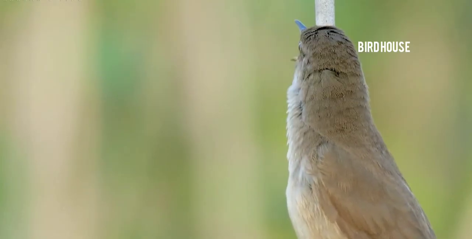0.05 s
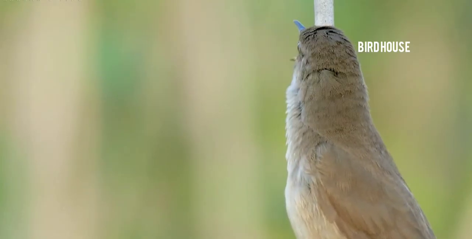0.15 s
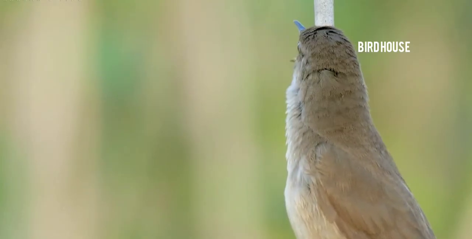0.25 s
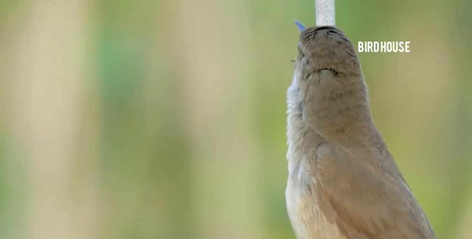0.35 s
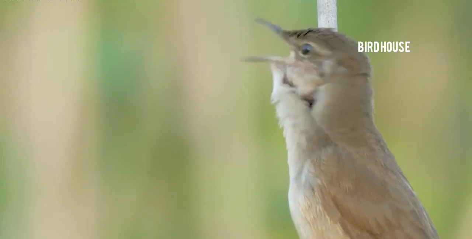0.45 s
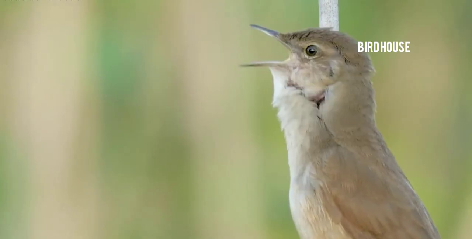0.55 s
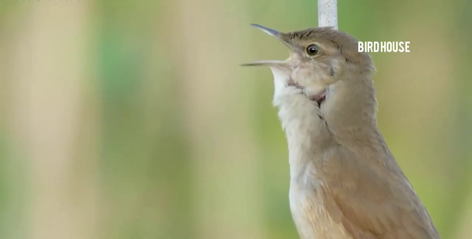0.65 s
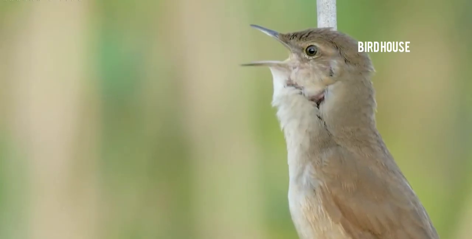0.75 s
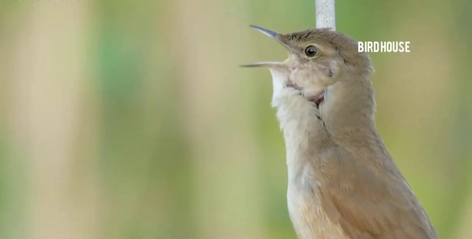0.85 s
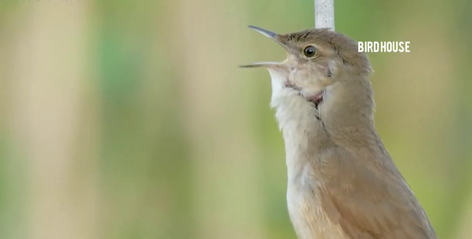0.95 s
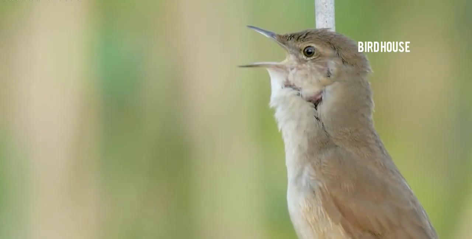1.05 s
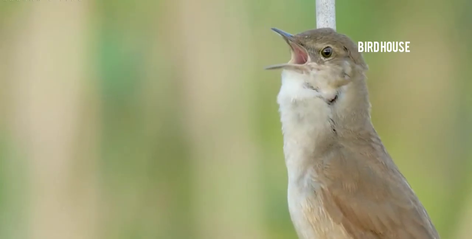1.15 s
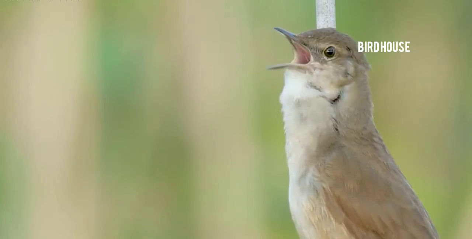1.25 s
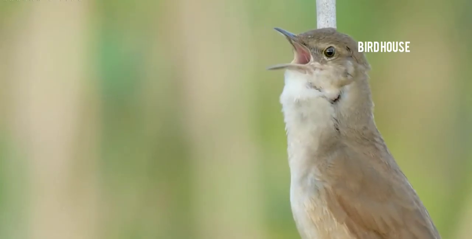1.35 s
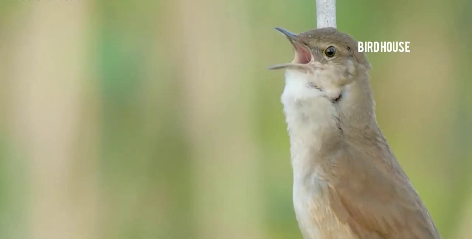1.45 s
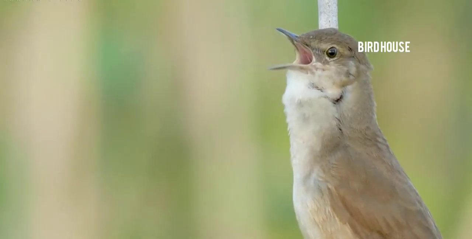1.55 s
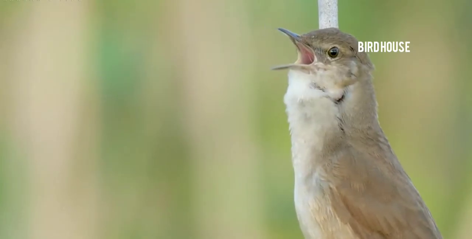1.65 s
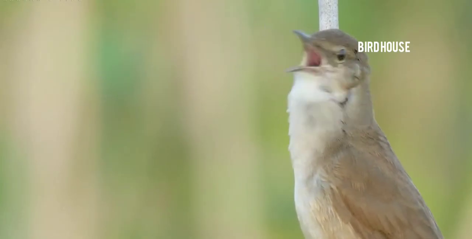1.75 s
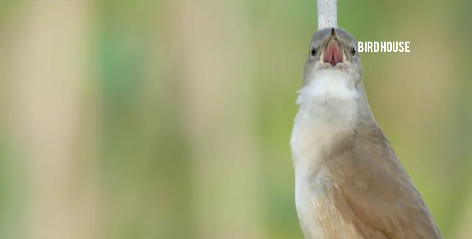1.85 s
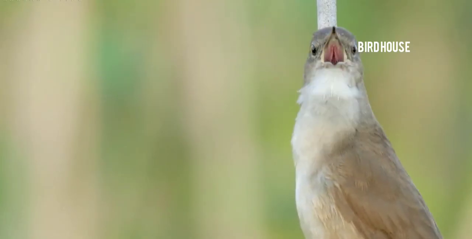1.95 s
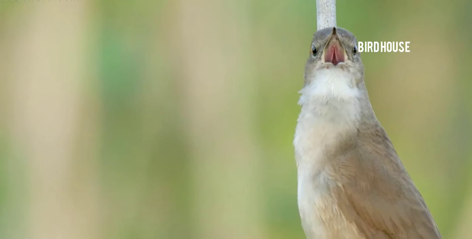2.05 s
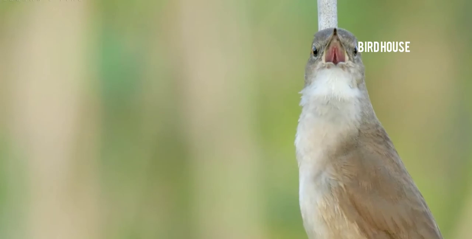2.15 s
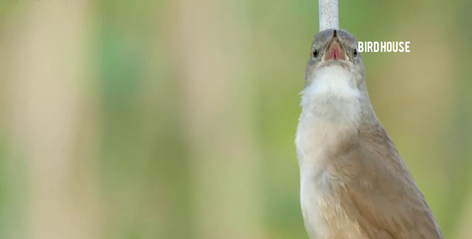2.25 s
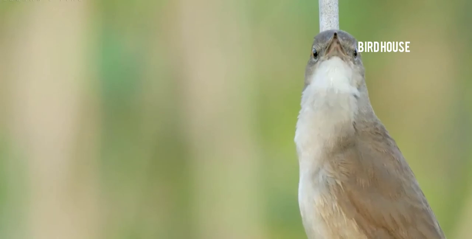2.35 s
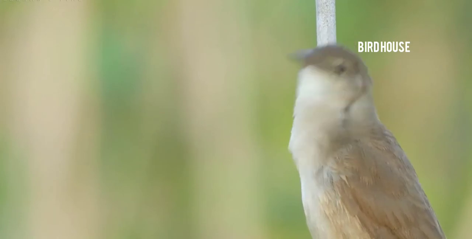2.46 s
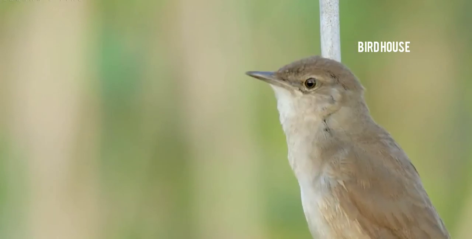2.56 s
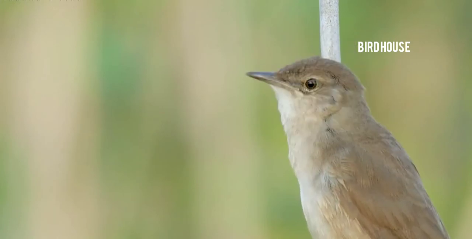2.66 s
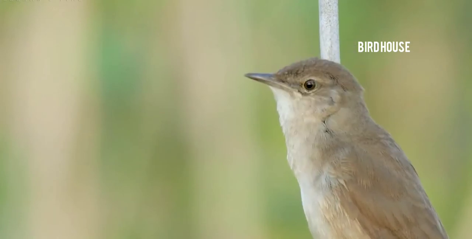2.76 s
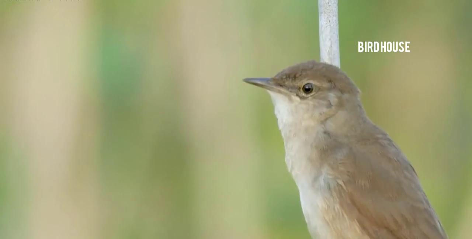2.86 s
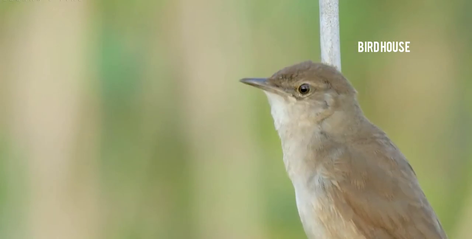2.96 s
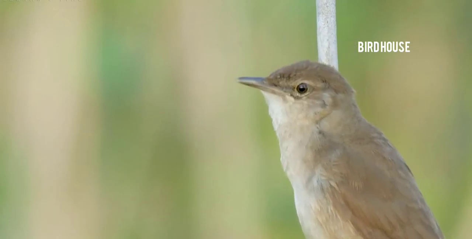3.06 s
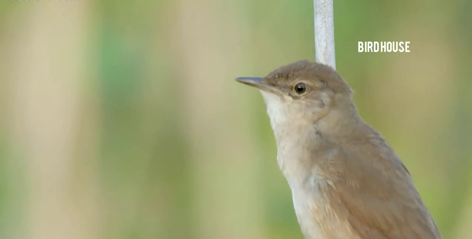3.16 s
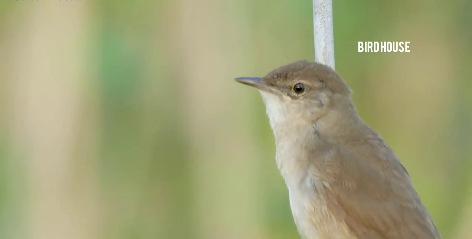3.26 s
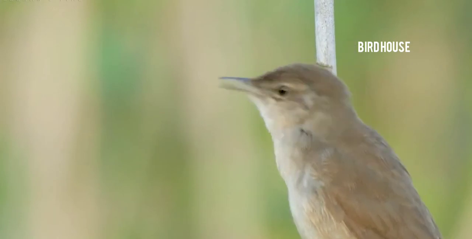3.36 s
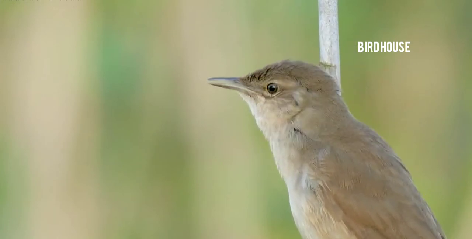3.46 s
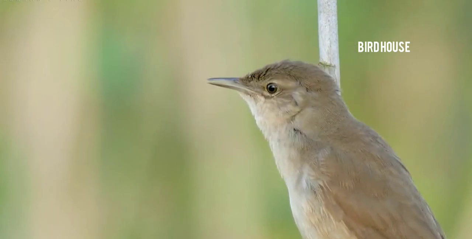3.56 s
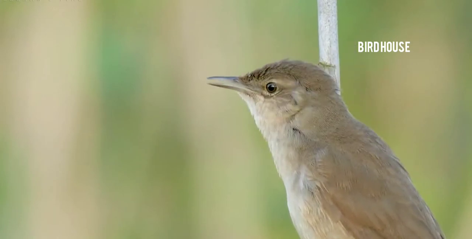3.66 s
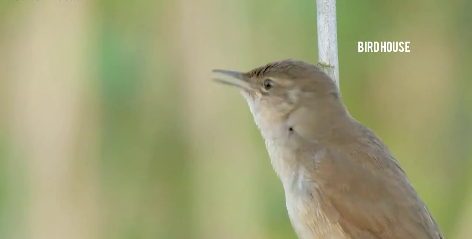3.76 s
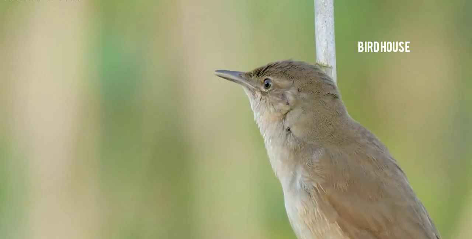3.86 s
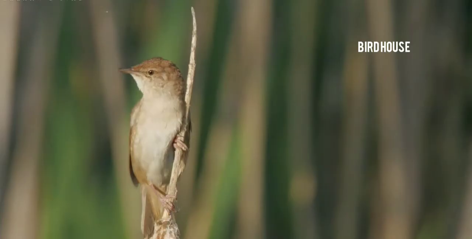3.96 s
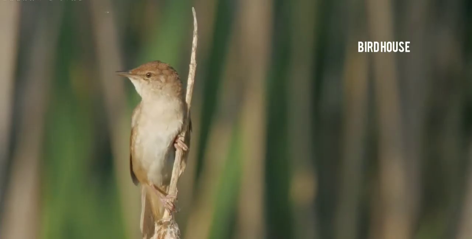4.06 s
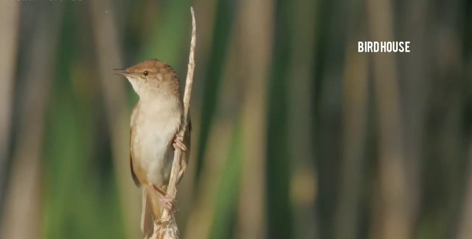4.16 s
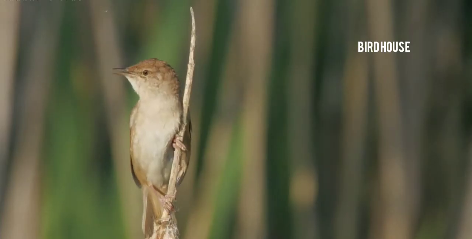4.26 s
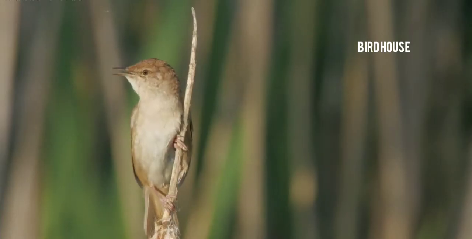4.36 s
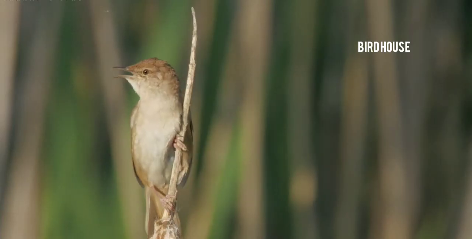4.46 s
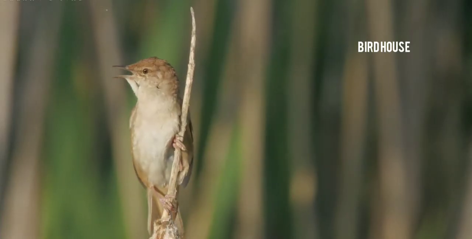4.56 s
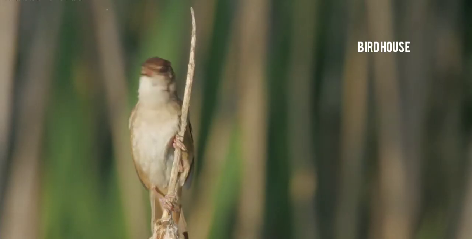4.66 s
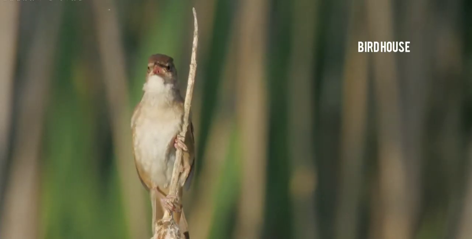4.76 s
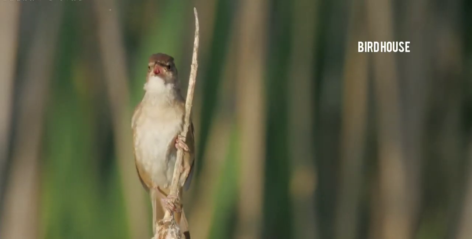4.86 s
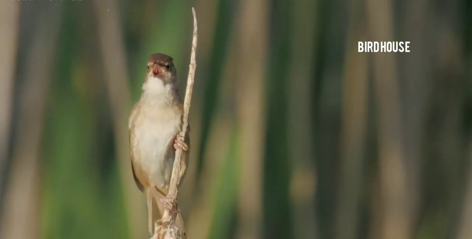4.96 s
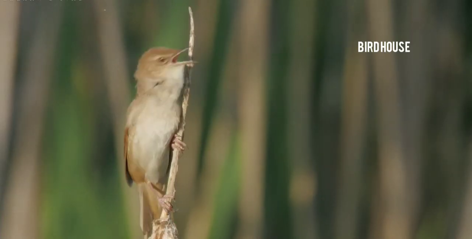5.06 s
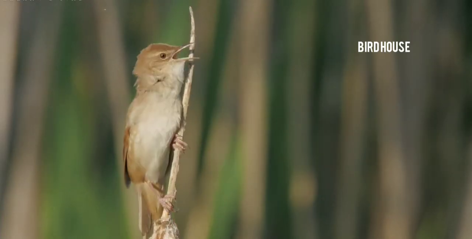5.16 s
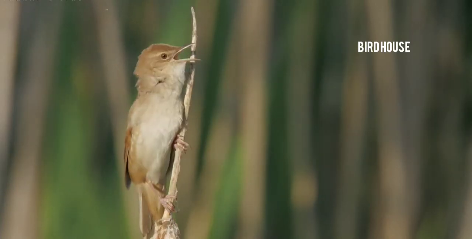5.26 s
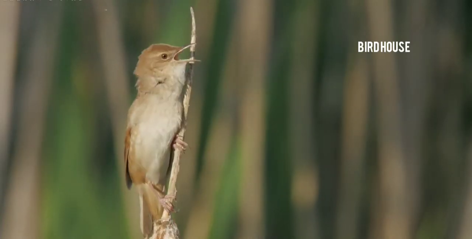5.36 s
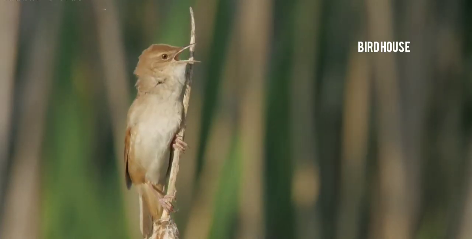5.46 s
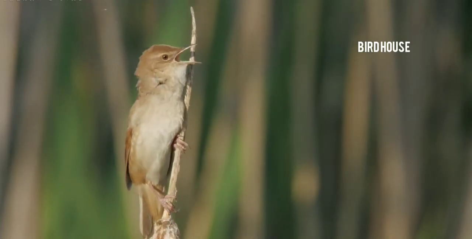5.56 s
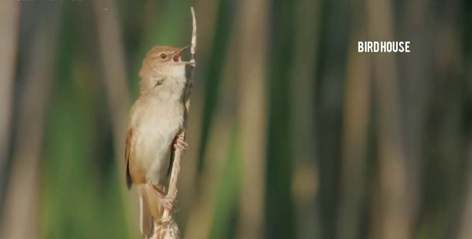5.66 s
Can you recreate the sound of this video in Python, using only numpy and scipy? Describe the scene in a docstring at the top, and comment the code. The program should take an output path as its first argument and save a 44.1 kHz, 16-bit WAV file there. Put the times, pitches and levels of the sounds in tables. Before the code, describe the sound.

A warbler close to the microphone sings a steady, high, buzzing trill that slows slightly and stops after about two and a half seconds. Fainter frogs croak and throb behind it over a soft outdoor hiss. In the pause, distant birds whistle and chirp, with a few short clucks. Near the end the warbler begins a second trill, quiet and ticking at first, then swelling.

```python
"""A warbler on a reed opens with a long trill, some 54 syllables a second, turning its head. Each
syllable is a click and a few short glides of the syrinx. Behind it, over a soft outdoor wash, frogs
croak and throb as larynx clicks ring their vocal sacs. The trill slows and stops at 2.4 s, leaving
the frogs, whistles of farther birds and a few clucks. At 4.6 s a second trill starts cold, quiet
and hurried, then warms up and swells. The reed bed scatters the voices."""
import sys
import numpy as np
from scipy import signal
from scipy.io import wavfile
from scipy.ndimage import uniform_filter1d

SR = 44100
rng = np.random.default_rng(int(sys.argv[2]) if len(sys.argv) > 2 else 0)


def bounce(signal):
    """Save signal as a 16-bit WAV file at the path given by the first command-line argument."""
    frames = np.transpose(np.atleast_2d(signal))
    limited = np.clip(frames, -1, 1)
    pcm = np.round(limited * 32767).astype(np.int16)
    wavfile.write(sys.argv[1], SR, pcm)


N = 251370


def amp(db):
    """Decibels to gain."""
    return 10 ** (np.asarray(db) / 20)


def unit_rms(x):
    """Scales to rms 1."""
    return x / np.sqrt(np.mean(x ** 2) + 1e-20)


def spectrum_at(points, hz):
    """Interpolates a spectrum over log frequency."""
    point_hz, value = np.transpose(points)
    return np.interp(np.log(hz + 1), np.log(point_hz + 1), value)


def curves_at(rows, t):
    """Interpolates each value column at times t."""
    time_s, *values = np.transpose(rows)
    return [np.interp(t, time_s, column) for column in values]


def add(mix, start_s, sound, pan_db=0.):
    """Mixes mono into stereo; positive pan is left."""
    at = round(start_s * SR)
    part = mix[:, max(at, 0):max(at + len(sound), 0)]
    part += amp([[pan_db / 2], [-pan_db / 2]]) * sound[max(-at, 0):][:part.shape[1]]


def resonate(x, hz, width_hz):
    """Unity-gain resonance: shift hz down to zero, smooth, shift back."""
    carrier = np.exp(2j * np.pi * np.cumsum(hz * np.ones(len(x))) / SR)
    pole = np.exp(-np.pi * width_hz / SR)
    return 2 * (carrier * signal.lfilter([1 - pole], [1, -pole], x / carrier)).real


def wander(rate_hz):
    """Smooth noise, rms 1."""
    size = max(int(SR / rate_hz), 1)
    return unit_rms(uniform_filter1d(uniform_filter1d(rng.standard_normal(N), size), size))


def reed_scatter(x, t60_s, gap_s):
    """Reed-bed echoes: a decaying tail of random taps, unlike in each ear."""
    t = np.arange(round(.6 * SR)) / SR
    taps = rng.standard_normal((2, len(t))) * amp(-60 * t / t60_s) * (t > gap_s)
    taps += .26 * taps[::-1]
    return signal.fftconvolve(x, taps / np.linalg.norm(taps[0]), axes=1)[:, :N]


# wash spectrum: (frequency [Hz], relative density [dB])
WASH_SPECTRUM = [(30, -59), (85, -26), (341, -30), (518, -24.5), (1050, -17.5), (1770, -2.5), (2180, -2.5),
                 (3230, -10.5), (3780, -5), (5310, -12.5), (11900, -19), (15500, -23.5)]
# left-right likeness: (frequency [Hz], correlation [0..1])
WASH_CORRELATION = [(40, 0.79), (300, 1), (3000, 0.56), (8000, 0.86), (13000, 0.35)]
# swell of far frogs: (time [s], lift [dB])
CHORUS_LIFT = [(0, 8), (3.6, 11), (3.75, 4.5), (4.9, 3.5), (5.7, 12)]
# band of that swell: (frequency [Hz], share of lift [0..1])
CHORUS_BAND = [(250, 0), (450, 1), (3000, 1), (7000, 0)]
def wash(rms_db=-43.5):
    """Far chorus, air and reeds: random short-time spectra with drifting patches."""
    frames, hz = N // 256 + 5, np.fft.rfftfreq(1024, 1 / SR)
    left_re, left_im, side_re, side_im, patches = rng.standard_normal((frames, 513, 5)).T
    patches = unit_rms(uniform_filter1d(uniform_filter1d(patches, size=9, axis=0), size=7, axis=1))
    far_birds = np.exp(-(np.log((hz + 1) / 3500) / .5) ** 2)[:, None]
    patch_db = (1.5 + 3 * far_birds) * patches
    lift_db = curves_at(CHORUS_LIFT, np.arange(frames) * 256 / SR)[0]
    chorus_db = spectrum_at(CHORUS_BAND, hz)[:, None] * lift_db
    correlation = spectrum_at(WASH_CORRELATION, hz)[:, None]
    left = left_re + 1j * left_im
    right = correlation * left + np.sqrt(1 - correlation ** 2) * (side_re + 1j * side_im)
    spectra = np.array([left, right]) * amp(spectrum_at(WASH_SPECTRUM, hz)[:, None] + patch_db + chorus_db)
    return amp(rms_db) * unit_rms(signal.istft(spectra, nperseg=1024, noverlap=768)[1][:, :N])


# reed snaps: (time [s], gain [dB])
SNAPS = [(2.581, -45.5), (5.208, -53)]
def reed_snaps(t60_s=.037):
    """Dry reeds snap: brief bursts of bright noise."""
    out, t = np.zeros((2, N)), np.arange(400) / SR
    for start_s, db in SNAPS:
        add(out, start_s, amp(db - 60 * t / t60_s) * np.diff(rng.standard_normal(402), 2), pan_db=3.)
    return out


# far birds: (time [s], length [s], start pitch [Hz], end pitch [Hz], level [dB])
WHISTLES = [(0.264, .08, 6200, 5240, -49), (0.485, 0.071, 6220, 5300, -52),
            (2.633, 0.082, 6080, 5980, -52.5), (2.698, 0.052, 5560, 4750, -51.5),
            (2.692, 0.015, 3430, 3270, -40.5), (2.673, 0.33, 3980, 3970, -50),
            (2.844, 0.016, 3730, 3000, -38.5), (2.853, 0.042, 6040, 6160, -53),
            (2.896, 0.072, 5170, 4860, -51), (3.088, 0.016, 3670, 3240, -42.5),
            (3.203, 0.054, 5140, 4910, -50), (3.306, 0.069, 7300, 4540, -55.5),
            (3.415, 0.039, 4920, 4570, -48.5), (3.567, 0.027, 3536, 3760, -36),
            (3.613, 0.024, 4070, 2870, -40), (3.641, 0.026, 3060, 2915, -36),
            (3.687, 0.048, 4500, 2750, -47), (3.727, 0.066, 2720, 2620, -43.5),
            (3.835, 0.075, 3156, 3660, -40), (3.88, 0.054, 7070, 4900, -51.5),
            (3.993, 0.025, 4680, 4390, -45), (4.012, 0.088, 2970, 2440, -45), (4.15, 0.21, 2740, 2920, -53),
            (4.344, 0.032, 2860, 3120, -46.5), (4.454, 0.032, 4030, 3680, -46.5),
            (4.797, 0.068, 5990, 5900, -54.5)]
RASP_DB, RASP_PITCH_RATIO = 8, .014
def whistles():
    """Gliding near-sines; the high twitter rasps, the rest only flutters."""
    out, flutter, shake = np.zeros((2, N)), wander(300), wander(500)
    sides = rng.uniform(-.86, 1, len(WHISTLES))
    for (start_s, length_s, start_hz, end_hz, db), side in zip(WHISTLES, sides):
        u = np.linspace(0, 1, round(length_s * SR))
        span = slice(round(start_s * SR), round(start_s * SR) + len(u))
        twitter = min(start_hz, end_hz) > 4400 and max(start_hz, end_hz) < 6500
        flutter_db, shake_ratio = (RASP_DB, RASP_PITCH_RATIO) if twitter else (4., .007)
        bend = np.sin(np.pi * u / 2) if start_hz < 5000 else u ** 3  # low glides ease, high speed up
        hz = (start_hz + (end_hz - start_hz) * (u + bend) / 2) * (1 + shake_ratio * shake[span])
        tone = np.sin(2 * np.pi * np.cumsum(hz) / SR) * signal.windows.tukey(len(u), .35)
        add(out, start_s, amp(db + flutter_db * np.minimum(flutter[span], 1)) * tone, 3.4 * side)
    return out


# scooped whistles, one table each: (time [s], pitch [Hz], level [dB])
SLURS = [
    [(3.505, 2860, -47), (3.53, 3210, -41), (3.56, 3900, -54), (3.6, 4670, -46), (3.65, 4850, -61)],
    [(4.14, 3810, -37.5), (4.175, 3704, -35.5), (4.218, 3790, -35.5), (4.235, 4270, -42),
     (4.258, 4850, -45.5), (4.3, 4850, -47.5), (4.33, 4560, -54)],
]
def slurs():
    """Whistles that slide unbroken between notes and rasp at the top."""
    out, flutter = np.zeros((2, N)), wander(250)
    for rows in SLURS:
        start_s, end_s = rows[0][0], rows[-1][0]
        hz, db = curves_at(rows, np.arange(start_s, end_s, 1 / SR))
        depth = np.clip((hz - 4000) / 700, .15, 1)
        rasp = depth * np.clip(flutter[round(start_s * SR):][:len(hz)], -3, 1)
        hz = uniform_filter1d(hz, size=700) * (1 + RASP_PITCH_RATIO * rasp)
        tone = np.sin(2 * np.pi * np.cumsum(hz) / SR) * signal.windows.tukey(len(hz), .08)
        add(out, start_s, amp(db + RASP_DB * rasp) * tone)
    return out


# marsh clucks: (time [s], level [dB])
CLUCKS = [(3.903, -34), (4.124, -37), (4.452, -34), (4.53, -41)]
def clucks(base_hz=2557, rise_s=.002, t60_s=.04):
    """One quick ring each, slightly detuned."""
    out, t = np.zeros((2, N)), np.arange(600) / SR
    for (start_s, db), tune in zip(CLUCKS, rng.uniform(.94, 1.03, len(CLUCKS))):
        envelope = amp(db - 60 * t / t60_s) * np.minimum(t / rise_s, 1)
        add(out, start_s, envelope * np.sin(2 * np.pi * base_hz * tune * t))
    return out


def larynx(rate_hz, size, hiss_gain):
    """Uneven clicks of a frog's larynx over a little hiss."""
    drift, loudness, hiss = rng.standard_normal((size, 3)).T
    cycles = np.cumsum(rate_hz * (1 + 3. * uniform_filter1d(drift, 300))) / SR + .9
    clicks = np.diff(np.floor(cycles), prepend=0) * amp(1.77 * loudness)
    return unit_rms(clicks) + hiss_gain * hiss


# frog position: (time [s], left minus right [dB])
FROG_PAN = [(0, -2), (1.8, -5.5), (3, -2), (5.7, 9.5)]
# croaks: (time [s], length [s], start resonance [Hz], end resonance [Hz], level [dB])
CROAKS = [(0.41, 0.096, 1420, 1430, -42.5), (0.547, 0.19, 2040, 1830, -41.5),
          (0.703, 0.14, 1540, 1440, -43), (0.751, 0.13, 1910, 2000, -41), (0.822, 0.12, 1420, 1570, -38.5),
          (0.974, 0.12, 1360, 1680, -44.5), (1.49, 0.14, 1220, 1580, -45), (1.653, 0.17, 1330, 1530, -40.5),
          (2.249, 0.23, 2060, 1790, -39.5), (2.714, 0.035, 1840, 1960, -39.5),
          (2.754, .14, 1405, 1560, -40), (3.143, 0.4, 1527, 1606, -43.5), (3.369, 0.22, 1976, 2000, -36),
          (3.417, 0.19, 1470, 1400, -42.5), (3.601, 0.079, 1460, 1320, -45.5),
          (4.028, 0.046, 1710, 1820, -39), (5.046, 0.47, 1307, 1370, -50.5),
          (5.25, 0.12, 1610, 1730, -45.5), (5.52, 0.44, 1750, 1610, -42)]
def croaking_frogs():
    """Clicks ring a vocal sac whose pitch slides as it swells."""
    out, sides = np.zeros((2, N)), rng.uniform(-1.1, 1, len(CROAKS))
    for (start_s, length_s, start_hz, end_hz, db), side in zip(CROAKS, sides):
        size = round(length_s * SR)
        hz = np.linspace(start_hz, end_hz, size)
        clicks = larynx(95, size, hiss_gain=.35)
        ring = unit_rms(resonate(resonate(clicks, hz, 150), hz, 340))
        pan_db = 5.1 * side + curves_at(FROG_PAN, start_s)[0]
        add(out, start_s, amp(db) * ring * signal.windows.tukey(size, .5), pan_db)
    return out


# lower and upper sac resonance: (base frequency [Hz], width [Hz], skirt [Hz])
SAC_MODES = [(2303, 370, 370), (2662, 490, 310)]
# phrases: (first burst [s], last burst [s], period [s], first level [dB], last level [dB],
# upper resonance gain [dB], first pitch [ratio], last pitch [ratio])
LAUGHS = [(-.005, .69, 0.058, -45.5, -46.5, 6, 1.084, 0.93),
          (0.979, 1.228, 0.062, -45, -41, -5, 0.87, 0.98), (1.299, 2.401, 0.073, -37, -35, -8, 1.044, 0.99),
          (2.484, 2.73, 0.08, -34.5, -40, -19, 0.957, 0.89),
          (2.938, 3.38, 0.079, -44.5, -43, -24, 0.95, 0.92)]
def laughing_frog(burst_s=.044, jitter_s=.005, jitter_db=1.2):
    """Nearly even bursts, each a handful of clicks ringing a small sac."""
    out, size = np.zeros((2, N)), round(burst_s * SR)
    for first_s, last_s, period_s, first_db, last_db, upper_db, *pitch in LAUGHS:
        count = round((last_s - first_s) / period_s) + 1
        lag, loudness = rng.standard_normal((count, 2)).T
        onsets_s = first_s + period_s * np.arange(count) + jitter_s * lag
        levels_db = np.linspace(first_db, last_db, count) + jitter_db * loudness
        for start_s, db, tune in zip(onsets_s, levels_db, np.linspace(*pitch, count)):
            clicks = larynx(140, size, hiss_gain=.45)
            lower, upper = (unit_rms(resonate(resonate(clicks, tune * hz, width), tune * hz, skirt))
                            for hz, width, skirt in SAC_MODES)
            burst = (lower + amp(upper_db) * upper) * signal.windows.tukey(size, .6)
            add(out, start_s, amp(db) * burst, curves_at(FROG_PAN, start_s)[0])
    return out


# syrinx overtones: (harmonic number, relative level [dB])
OVERTONES = [(2, 6.5), (3, -2), (4, -19)]
def syrinx_blip(t, row, pitch, shift, max_rise_ms=1.2):
    """One short glide, as (fundamental, overtones); a long one rings out slowly."""
    centre_ms, start_hz, end_hz, length_ms, db = row
    u = np.clip((1000 * t - centre_ms - .07 * shift) / length_ms, -.5, .5)
    cycles = pitch * ((start_hz + end_hz) / 2 * t + (end_hz - start_hz) * length_ms / 2000 * u ** 2)
    overtones = sum(amp(level_db) * np.cos(2 * np.pi * k * cycles) for k, level_db in OVERTONES)
    rise = min(max_rise_ms / length_ms, .5)
    envelope = np.sin(np.pi * np.interp(u + .5, [0, rise, 1], [0, .5, 1])) ** 2
    return amp(db) * envelope * np.array([np.cos(2 * np.pi * cycles), overtones])


# blips of a warm syllable, one table a trill:
# (centre [ms], start pitch [Hz], end pitch [Hz], length [ms], relative level [dB])
BLIPS = [
    [(.6, 3340, 3980, 1.85, -3.5), (1.9, 4316, 4656, 3.54, 0), (3.7, 4402, 3796, 2.72, -6.5),
     (6.5, 3600, 4350, 1.95, -2), (13.8, 3980, 3840, 12.16, -3.5)],
    [(1.1, 3560, 4210, 2.83, 2), (2.2, 4440, 4580, 1.7, 2.5), (4., 3680, 4800, 1.8, 2.5),
     (5.6, 4200, 4200, 1.7, -8), (6.8, 3600, 4300, 1.9, 5.5), (12.4, 4000, 3860, 9.7, -2)],
]
# thin opening click, one table a trill: columns as BLIPS
CLICKS = [
    [(-0.4, 4980, 6700, 1.01, 15.4), (1.5, 6850, 6420, 6.95, 7)],
    [(1, 5850, 5950, 3.5, 6.8), (2.2, 6160, 6120, 0.86, 13), (5, 6600, 5470, 2.7, 2.4)],
]
# beak resonances, one table a trill: (frequency [Hz], width [Hz], gain [dB])
BEAK_MODES = [
    [(8135, 135, 2), (12250, 390, -2.5), (14300, 360, -4), (14150, 350, -4.5)],
    [(8200, 450, -10), (12650, 390, 2.5), (13900, 560, -5)],
]
THROAT_BAND_HZ, BEAK_BYPASS_DB, BREATH_DB, CLICK_DB = (3353, 4724), -9.5, 7, 13.5
COLD_LATE_DB, COLD_CLICK_DB, COLD_EARLY_DROP, COLD_LATE_RISE = -23, 17.5, .17, .166
def syllable(trill, bright_db, cold, jitter):
    """A click, then blips through windpipe and beak. Cold: clickier, early blips low, late ones faint."""
    t = np.arange(-100, 1000) / SR
    blips = BLIPS[trill]
    shifts, loudness, detune = jitter.T
    late = np.clip(np.array(blips)[:, 0] / 5 - .2, 0, 1)  # 0 to 1 over 1-6 ms
    levels_db = 1.2 * loudness + late * COLD_LATE_DB * (1 - (1 - cold) ** 2)
    pitches = 1 + .006 * detune[0] + .005 * detune
    pitches *= 1 - (1 - late) * COLD_EARLY_DROP * cold ** 2 + late * COLD_LATE_RISE * cold
    body, overtones = sum(amp(db) * syrinx_blip(t, row, pitch, shift)
                          for row, db, pitch, shift in zip(blips, levels_db, pitches, shifts))
    source_rms = np.sqrt(np.mean(body ** 2))
    throat = signal.butter(4, THROAT_BAND_HZ, "band", fs=SR, output="sos")
    body = signal.sosfilt(throat, np.roll(body, -20))  # advance offsets the filter delay
    breath = np.diff(rng.standard_normal(len(t) + 2), n=2) / np.sqrt(6)
    treble = overtones + amp(BREATH_DB) * abs(body) * breath
    ring = sum(amp(db) * resonate(treble, hz, width_hz) for hz, width_hz, db in BEAK_MODES[trill])
    voice = (body + amp(bright_db) * (amp(BEAK_BYPASS_DB) * treble + ring)) / source_rms
    click, click_overtones = sum(amp(1.5 * loud) * syrinx_blip(t, row, 1 + .008 * tune, shift)
                                 for row, (shift, loud, tune) in zip(CLICKS[trill], jitter[::-1]))
    click_db = bright_db + CLICK_DB + COLD_CLICK_DB * np.clip(1 - (1 - cold) / .28, 0, 1)
    return voice + amp(click_db) * (click + amp(bright_db + 4) * click_overtones)


def through_reeds(song, scatter_db, sheen_hz=9300, sheen_direct=.61, sheen_db=-2, sheen_pan_db=6.5):
    """Song plus scatter: moving reeds keep changing the paths and smear the top overtones most."""
    swaying = song * (.95 + .3 * wander(30))
    treble = signal.sosfiltfilt(signal.butter(4, sheen_hz, "high", fs=SR, output="sos"), song)
    sheen_gain = amp([[sheen_db + sheen_pan_db / 2], [sheen_db - sheen_pan_db / 2]])
    sheen = sheen_gain * reed_scatter(treble, .08, .001)
    direct = song - (1 - sheen_direct) * treble
    scatter = reed_scatter(swaying, .15, .003) + amp(-7) * reed_scatter(swaying, .5, .03)
    return direct + sheen + amp(scatter_db) * scatter


# trill timing: (start [s], syllables [count], steady period [ms], gained by a hurried start [ms],
# lost by a tiring end [ms], warm-up [s])
TRILLS = [(-.0005, 129, 18.75, 0, 6.3, 0), (4.6281, 59, 18.65, 23.8, 0, .55)]
# effort and head turn, one table a trill:
# (time [s], level [dB], beak brightness [dB], left minus right [dB])
EFFORT = [
    [(0, -25.5, -37, 0), (.5, -26, -35, -1), (.65, -27, -31, -0.5), (2, -24.5, -31, -1),
     (2.33, -25, -32, -.5), (2.41, -33, -36.5, 0)],
    [(4.62, -45.5, -28.5, 2), (4.82, -36.5, -33.5, 1.5), (5.08, -31.5, -35, 1), (5.16, -28, -35, 0),
     (5.45, -28, -38, 0.5), (5.7, -24.5, -34, 1.5)],
]
SCATTER_DB = (-6, -11)  # per trill; higher when the bird faces away
def warbler(hurry_syllables=16, tire_syllables=7.5, jitter_ms=.2):
    """Strings slightly varied syllables on the beat of each trill."""
    out = np.zeros((2, N))
    for trill, (start_s, count, period_ms, gained_ms, lost_ms, warmup_s) in enumerate(TRILLS):
        n, song = np.arange(count), np.zeros((2, N))
        jitter = rng.standard_normal((count, len(BLIPS[trill]), 3))
        lead_ms = gained_ms * (1 - np.exp(-n / hurry_syllables))
        lag_ms = lost_ms * np.exp((n + 1 - count) / tire_syllables)
        onsets_s = start_s + (n * period_ms - lead_ms + lag_ms + jitter_ms * jitter[:, 1, 2]) / 1000
        cold = np.clip(1 - (onsets_s - start_s) / warmup_s, 0, 1) if warmup_s else np.zeros(count)
        db, bright_db, pan_db = curves_at(EFFORT[trill], onsets_s)
        for k in n:
            sound = syllable(trill, bright_db[k], cold[k], jitter[k])
            add(song, onsets_s[k] - 100 / SR, amp(db[k]) * sound, pan_db[k])
        out += through_reeds(song, SCATTER_DB[trill])
    return out


def scene():
    """Near warbler, marsh voices and far birds with their scatter, over snaps and wash."""
    marsh = croaking_frogs() + clucks() + laughing_frog()
    marsh = signal.sosfilt(signal.butter(2, 400, "high", fs=SR, output="sos"), marsh)
    far_birds = whistles() + slurs()
    near_bird = warbler()
    scatter = reed_scatter(marsh, .35, .006) + reed_scatter(far_birds, .38, .006)
    return near_bird + marsh + far_birds + amp(-4) * scatter + reed_snaps() + wash()


def record(dry):
    """Steep low-pass at 15.76 kHz."""
    return signal.oaconvolve(dry, signal.firwin(511, 15760, window=("kaiser", 9), fs=SR)[None], "same")


dry = scene()
out = record(dry)
bounce(out)
```